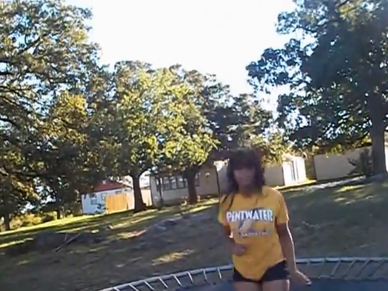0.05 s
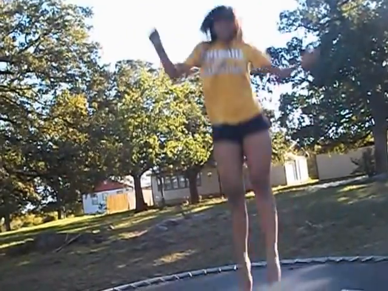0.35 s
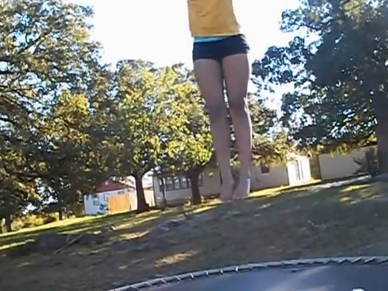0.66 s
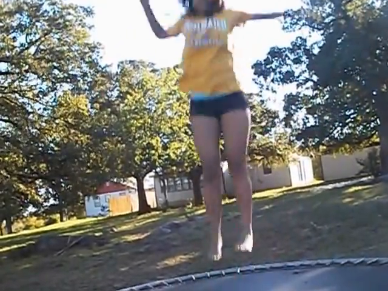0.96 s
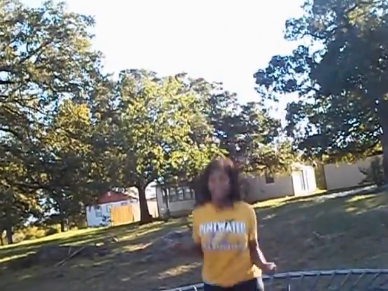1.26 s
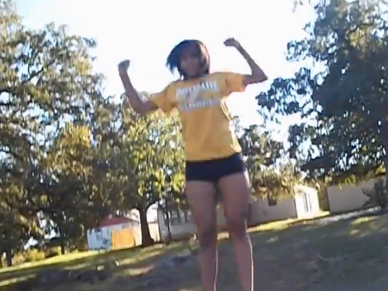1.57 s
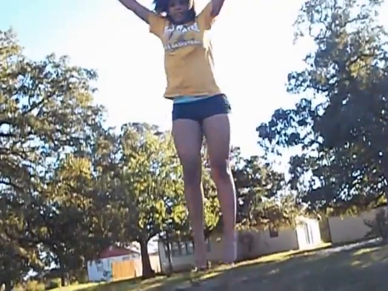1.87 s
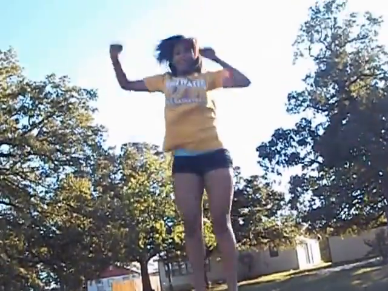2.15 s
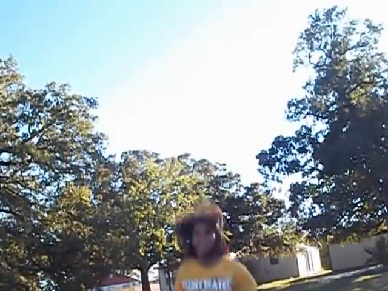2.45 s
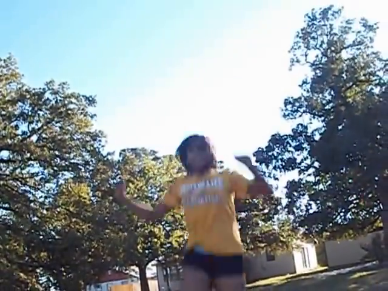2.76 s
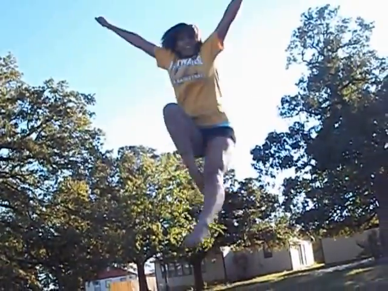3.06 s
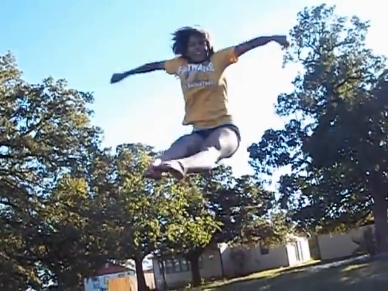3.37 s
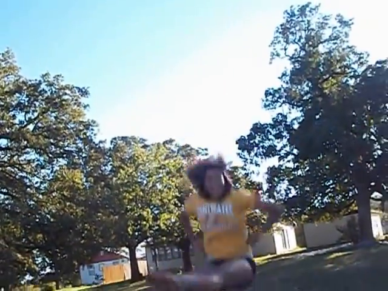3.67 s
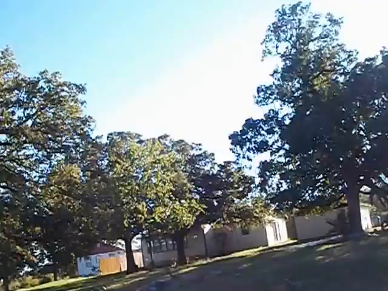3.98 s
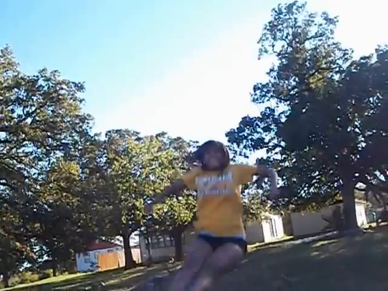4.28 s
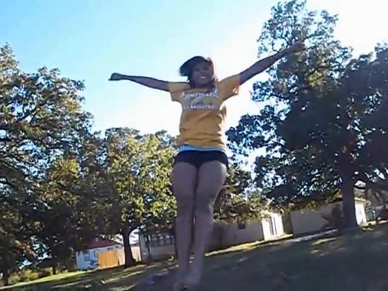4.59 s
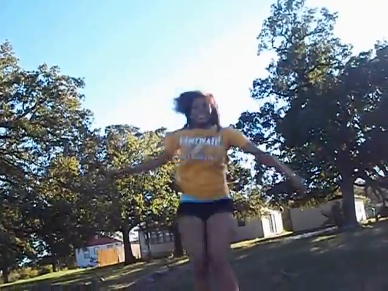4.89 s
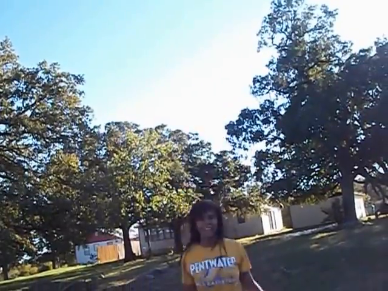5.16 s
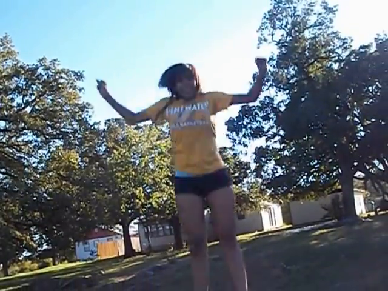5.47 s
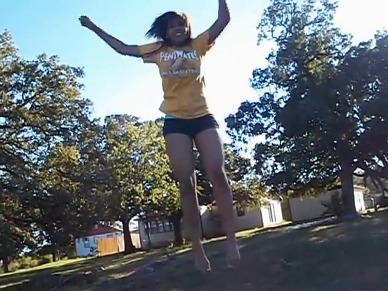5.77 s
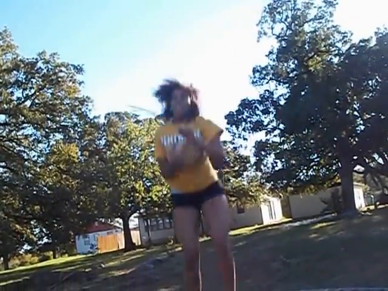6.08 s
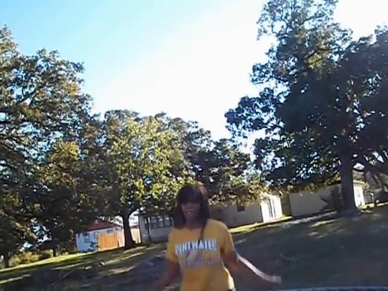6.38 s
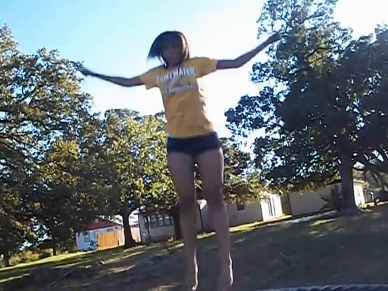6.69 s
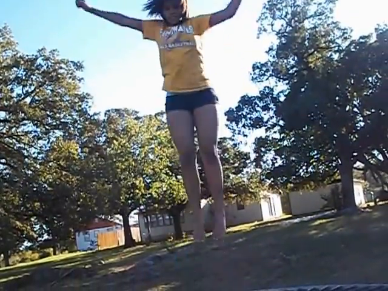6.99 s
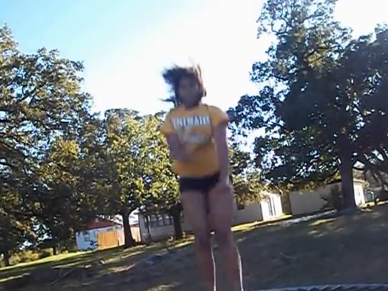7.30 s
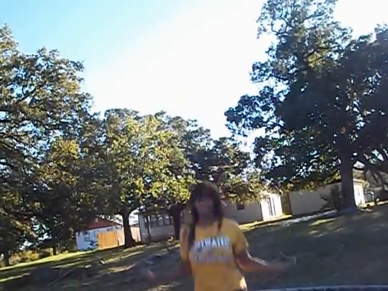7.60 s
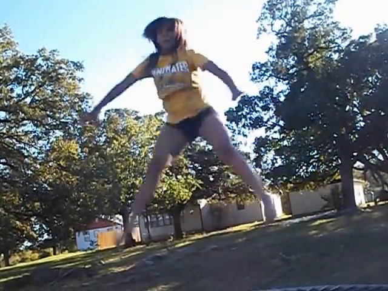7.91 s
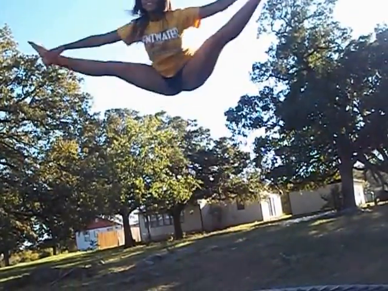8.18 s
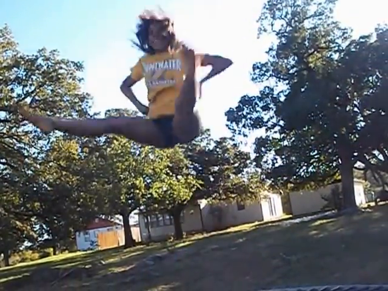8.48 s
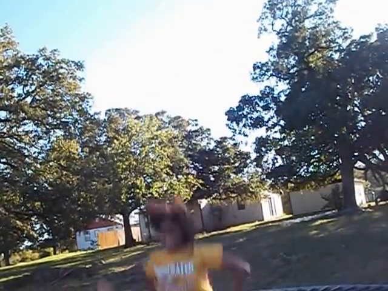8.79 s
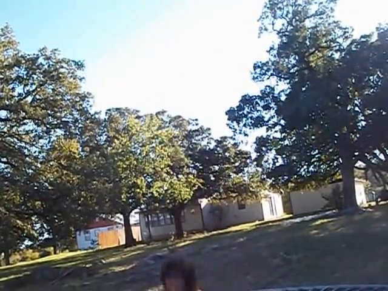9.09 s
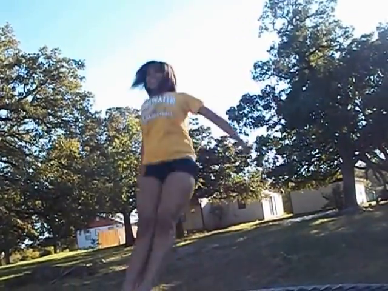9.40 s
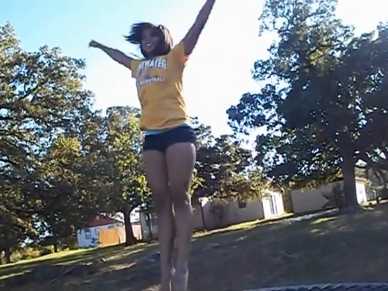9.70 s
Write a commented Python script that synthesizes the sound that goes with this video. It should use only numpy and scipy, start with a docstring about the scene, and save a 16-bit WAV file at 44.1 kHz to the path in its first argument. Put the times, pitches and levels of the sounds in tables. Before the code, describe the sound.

Rhythmic slaps of a trampoline mat, each followed by rattling, high squeaking springs, with gusting wind and a dull outdoor hush.

```python
"""Bouncing on a garden trampoline

Someone bounces close to a small camera. The mat slaps at each landing and the steel springs jingle.
Their hooks chirp as the load changes and squeak in the rocking frame between landings.
Wind buffets the microphone over a dull outdoor hush, with faint, far yaps and one soft hum."""
import sys
import numpy as np
from scipy import signal
from scipy.fft import rfft, irfft, next_fast_len
from scipy.io import wavfile
from scipy.ndimage import uniform_filter1d, map_coordinates

SR = 44100
rng = np.random.default_rng(int(sys.argv[2]) if len(sys.argv) > 2 else 0)


def master_out(mix):
    """Clip the mix to full scale and print it as 16-bit PCM to the path in sys.argv[1]."""
    frames = np.transpose(np.atleast_2d(mix))
    ceiling = np.clip(frames, -1, 1)
    pcm = np.round(ceiling * 32767).astype(np.int16)
    wavfile.write(sys.argv[1], SR, pcm)


N = 434385
T = np.arange(N) / SR

# Levels in all tables are relative; t60 is the time a sound takes to fade by 60 dB.
# The mat throws the jumper off: the springs shake and the hooks scrape, chirp, then whistle.
# t/s, shaking/dB, scrape/dB, scrape f/Hz, chirp/dB, wait for whistle/s, whistle/dB, whistle f/Hz
REBOUNDS = [(0.458, -57, -35.5, 3900, -53, 0.12, -37, 4330),
            (1.7, -51, -38, 3890, -56.5, 0.081, -36.5, 4070),
            (2.948, -52.5, -37.5, 3935, -50, 0.084, -37, 4300),
            (4.337, -56.5, -34, 3930, -51, 0.067, -39.5, 3920),
            (5.56, -61, -37, 3870, -60, 0.11, -36, 4240),
            (6.726, -63, -37, 3940, -52.5, 0.097, -36.5, 4220),
            (7.948, -54.5, -34.5, 3900, -47, 0.086, -36.5, 4270),
            (9.344, -54.5, -35.5, 3880, -50.5, 0.092, -34.5, 4270)]


def undb(db):
    """Turn decibels into a gain."""
    return 10 ** (np.asarray(db) / 20)


def unit(x):
    """Scale to an average strength (rms) of 1."""
    return x / np.sqrt(np.mean(x ** 2) + 1e-20)


def curve(rows):
    """Join (t/s, value) points with straight lines."""
    return np.interp(T, *np.transpose(rows))


def add(out, s, x):
    """Mix x into out, starting at s seconds."""
    i = max(int(s * SR), 0)
    out[i:i + len(x)] += x[:max(N - i, 0)]


def colour(x, points):
    """Shape bass and treble along an outline of (f/Hz, level/dB) points."""
    hz, db = np.transpose(points)
    size = next_fast_len(len(x))
    f = np.maximum(np.fft.rfftfreq(size, 1 / SR), 1)
    gain = undb(np.interp(np.log(f), np.log(hz), db))
    return irfft(rfft(x, size) * gain, size)[:len(x)]


def noise(points):
    """Steady noise with the given tone colour."""
    return unit(colour(rng.standard_normal(N), points))


def resonate(x, modes):
    """Let x ring at each resonance: f/Hz, width/Hz, level/dB."""
    return sum(undb(db) * signal.lfilter(*signal.iirpeak(hz, hz / width, SR), x)
               for hz, width, db in modes)


def walk(rate, size=N):
    """Wander smoothly by about 1 either way, taking `rate` random steps a second."""
    k = max(int(SR / rate), 1)
    steps = np.repeat(rng.standard_normal(size // k + 2), k)
    return 1.3 * uniform_filter1d(uniform_filter1d(steps, k), k)[:size]


def swell(half_s):
    """A position u running from -1 to 1 in twice half_s, and a bell-shaped loudness over it."""
    u = np.arange(-int(half_s * SR), int(half_s * SR)) / (half_s * SR)
    return u, np.cos(np.pi * u / 2) ** 2


def surge(s, db, rise_db_per_s, fall_db_per_s):
    """Power that builds up to a peak at time s and dies away."""
    return undb(db - rise_db_per_s * np.maximum(s - T, 0) - fall_db_per_s * np.maximum(T - s, 0)) ** 2


def fade(t, t60):
    """Die away by 60 dB every t60 seconds."""
    return np.exp(-np.log(1000) * t / t60)


def tone(hz):
    """A pure note that follows a changing pitch."""
    return np.sqrt(2) * np.sin(2 * np.pi * np.cumsum(hz) / SR)


def scatter(x, t60, wet_db):
    """Add a short, blurred tail of echoes, as when sound runs round the frame."""
    t = T[:SR // 2]
    tail = rng.standard_normal(len(t)) * fade(t, t60)
    return x + undb(wet_db) * signal.fftconvolve(x, tail / np.sqrt(np.sum(tail ** 2)))[:N]


def catch(t, rise_s=.003):
    """Rise quickly from 0 to 1 as t passes zero."""
    return .5 + .5 * np.tanh(t / rise_s)


def slaps(rise_s=0.0032, hold_s=0.0061, folds_per_s=4000):
    """The body meets the tight fabric, whose folds tick one after another in a short crack."""
    # blows on the mat: t/s, level/dB, t60/s, tilt towards treble/dB
    blows = [(1.426, -23, 0.062, 0.5), (2.654, -29, 0.022, -18), (2.677, -18.5, 0.052, 0),
             (2.995, -35.5, .06, -5), (4.082, -26.5, 0.058, -1), (4.192, -33.5, 0.013, 1),
             (5.277, -28.5, 0.063, 0), (5.433, -35.5, .03, -7), (6.453, -24, 0.071, 0),
             (7.647, -34.5, 0.23, -5), (8.991, -37.5, 0.031, -2.5), (9.086, -12, 0.043, 2)]
    # resonances of the mat: f/Hz, width/Hz, level/dB
    mat_modes = [(796, 54, 9.5), (970, 122, 13), (1390, 62, -25.5), (1537, 77, 5), (1810, 89, -10),
                 (2580, 480, -8.5), (3044, 100, -2), (3520, 74, 2.5), (4120, 260, -13.5)]
    out, t = np.zeros(N), T[:SR // 6]
    for s, db, t60, tilt in blows:
        envelope = np.minimum(0.13 + t / rise_s, 1) * fade(np.maximum(t - hold_s, 0), t60)
        folds = rng.choice([-1, 1], len(t)) * (rng.random(len(t)) < folds_per_s / SR)
        brightness = [(250, 3.5 - 2 * tilt), (750, -tilt), (4000, 5.3 * tilt), (7000, -16 + 2 * tilt)]
        crack = envelope * colour(resonate(folds, mat_modes), brightness)
        opening_rms = np.sqrt(np.mean(crack[:SR // 100] ** 2))
        add(out, s, undb(db) * crack / opening_rms)
    return out


def twang(waver_hz=16):
    """A hard landing plucks the springs, which ring on after the slap."""
    # landings that pluck the springs: t/s, level/dB
    plucks = [(1.426, -46.5), (2.677, -41.5), (4.082, -48), (5.277, -47.5), (6.453, -52), (9.0861, -34.5)]
    # notes of a plucked spring: f/Hz, level/dB, t60/s
    notes = [(3322, 0, .55), (3475, 4, 0.17), (3595, 11, 0.1), (3105, 8, .07), (2680, -6, 0.3)]
    out, t = np.zeros(N), T[:2 * SR // 3]
    for s, pluck_db in plucks:
        for hz, db, t60 in notes:
            add(out, s, undb(pluck_db + db) * fade(t, t60) * tone(hz + waver_hz * walk(330, len(t))))
    return out


def shaking(lag_s=0.047):
    """How hard the springs shake: once as the mat sinks, and again as it comes back."""
    # the mat sinks under the jumper: peak t/s, level/dB, rise/(dB/s), fall/(dB/s)
    landings = [(0.231, -49, 53, 63), (1.474, -43.5, 133, 116), (2.735, -45.5, 121, 98),
                (4.161, -45.5, 75, 101), (5.325, -43.5, 114, 57), (6.495, -45.5, 140, 87),
                (7.736, -44.5, 133, 155), (9.13, -41, 220, 116)]
    sink = sum(surge(*landing) for landing in landings)
    back = sum(surge(s + lag_s, db, rise_db_per_s=69, fall_db_per_s=34.5) for s, db, *_ in REBOUNDS)
    return np.sqrt(sink + back)


def springs(slap, ticks_per_s=2200, spread_db=3, ring_db=6, clink_db=-6, slap_db=-13):
    """Dozens of hooks tick against the frame in bunches; every tick and slap sets the coils ringing."""
    # tone colour of the rattling hooks: f/Hz, level/dB
    rattle_colour = [(400, -23), (1000, -1.5), (1600, 0.5), (2000, -5), (2600, -0.5), (3500, -0.5),
                     (4300, -3), (5000, -3.5), (6000, -9.5), (7500, -39)]
    # single hooks knocking on the frame: t/s, level/dB, time to fade to 37 percent/s
    clinks = [(0.118, -48, 0.023), (0.221, -41, 0.023), (0.349, -40, 0.02), (0.555, -44, .03),
              (0.5988, -43.5, .02), (1.9248, -40, 0.015), (2.5462, -46.5, 0.018), (3.0066, -40, .018),
              (3.173, -43.5, .02), (3.4426, -39.5, .005), (3.979, -47, 0.015), (4.039, -39.5, .02),
              (4.632, -41, .015), (5.2107, -40.5, 0.018), (5.815, -48, 0.0146), (6.495, -33.5, .03),
              (6.5988, -40.5, 0.016), (6.9757, -43.5, .014), (7.725, -40, 0.023), (7.768, -44, .012),
              (8.1643, -47, .02), (8.2716, -43, 0.02)]
    # tone colour of one knock: f/Hz, level/dB
    clink_colour = [(400, -22), (1500, -3.5), (2000, -8), (2700, 1.5), (3500, -1), (4300, -3.5),
                    (5000, -8.5), (7500, -37.5)]
    # notes of the coils: f/Hz, level/dB, t60/s
    coils = [(2320, -7, .14), (2545, -6, .12), (2622, 2.5, .11), (2682, 0, .13), (2780, -3, .09),
             (2880, -1, .07), (3022, 1.5, .11), (3115, -2, .08), (3325, 2, .3), (3360, 1, .09),
             (3460, 0, .15), (3595, 2, .15), (3665, -2, .08), (3937, -4, .1), (4200, -6, .1)]
    ticks = (rng.random(N) < ticks_per_s / SR) * rng.choice([-1, 1], N)
    ticks = ticks * undb(spread_db * rng.standard_normal(N))
    bunches = undb(2.8 * walk(130))
    unevenness = undb(1 + 2.5 * walk(35))
    rattle = unit(colour(ticks * bunches, rattle_colour)) * shaking() * unevenness
    t = T[:SR // 12]
    for s, db, decay_s in clinks:
        knock = unit(colour(rng.standard_normal(len(t)), clink_colour))
        add(rattle, s, undb(db + clink_db) * knock * np.exp(-t / decay_s))
    modes = [(hz, np.log(1000) / (np.pi * t60), db) for hz, db, t60 in coils]
    return rattle + undb(ring_db) * resonate(rattle + undb(slap_db) * slap, modes)


def squeak(hz, half_s, rough, climb_hz, grit, slip_hz=320, glide_hz=25, arch_hz=90):
    """Steel sticks and slips: an arching note, roughened by grit and side tones spaced by the slip rate."""
    u, envelope = swell(half_s)
    below_pitch_hz = climb_hz / (1 + np.exp((u * half_s + .014) / .011))  # shrinks quickly to zero
    pitch = hz + glide_hz * u - arch_hz * u ** 2 - below_pitch_hz
    # the side tones stay inside the range in which the hook rings
    sides = [1, 2] if hz < 3720 else [-1, -2] if hz > 4100 else [-1, 1]
    tones = []
    for k in [0] + sides:
        bend_hz = (k > 0) * 110 * (envelope - np.pi / 4)  # upper tones rise and fall with the pressure
        jitter_hz = (47 * np.sqrt(rough) + 20 * abs(k)) * walk(450, len(u))
        flutter = unit(undb(1.6 * (2 + abs(k)) * walk(163.3, len(u))))
        tones.append(tone(pitch + k * slip_hz + bend_hz + jitter_hz) * flutter)
    centre, near, far = tones
    far = far * undb(-6 * (abs(sides[1]) - 1))
    # the hook catches at once on a pure note; the rough part follows 7 ms later
    since_s = (u + .56) * half_s
    pure = np.sqrt(1 - rough) * centre * catch(since_s)
    harsh = np.sqrt(rough) * unit(near + far + undb(-4) * grit) * catch(since_s - .007)
    return envelope ** 0.75 * (pure + harsh)


def hooks(gain_db=-0.9, rub_db=-17.5, rub_lag_s=0.037):
    """The hooks scrape, whistle and rub on at each rebound, then squeak as the frame keeps rocking."""
    # one squeak for each swing of the frame: middle t/s, level/dB, f/Hz, half length/s, roughness/0-1
    swings = [(0.689, -54, 3960, 0.05, 0.4), (0.751, -50.5, 4020, 0.056, .6),
              (0.812, -43, 3930, 0.06, 0.23), (0.953, -48, 3980, 0.06, 0.25), (1.061, -57, 3890, 0.05, 0),
              (1.175, -54.5, 4030, 0.051, 0.2), (2.023, -47, 3950, 0.088, 0.25),
              (2.167, -53.5, 3870, 0.055, 0.74), (2.27, -59, 3900, .06, 0.14),
              (2.402, -54, 3630, 0.08, 0.3), (3.135, -50, 3910, 0.042, 0.15),
              (3.212, -48.5, 3970, 0.039, 0.2), (3.252, -44, 3615, .04, 0.15),
              (3.32, -55.5, 3860, .07, 0.4), (3.41, -49.5, 3560, .04, 0.3), (3.51, -55, 3900, 0.09, 0.5),
              (3.615, -50.5, 3850, .04, 0.18), (3.788, -57, 3870, .05, 0.3),
              (4.588, -36.5, 3980, 0.052, 0.6), (4.669, -38, 4000, .055, 0.5),
              (4.752, -42, 3910, .055, 0.37), (4.836, -41, 3910, .055, 0.4),
              (4.912, -42.5, 3940, 0.062, 0.2), (4.99, -39.5, 3880, 0.041, 0.35),
              (5.073, -46, 3890, 0.043, .45), (5.178, -46.5, 3920, 0.054, 0.1),
              (5.852, -48, 3940, 0.027, 0.1), (5.905, -46, 3900, .052, 0.4), (5.979, -55.5, 3980, .045, 0),
              (6.089, -54.5, 3920, 0.093, 0), (6.237, -51.5, 3960, 0.072, 0), (6.955, -54, 4000, 0.033, .3),
              (7.03, -46.5, 3810, 0.059, 0.5), (7.099, -51.5, 3740, 0.044, 0.4),
              (7.237, -49, 3624, .075, 0.16), (7.422, -49, 3590, 0.036, .3), (8.23, -47, 3900, 0.022, 0.1),
              (8.26, -47, 3580, 0.024, 0.15), (8.3, -48.5, 3820, 0.05, 0), (8.365, -56, 3780, 0.037, .15),
              (8.422, -45.5, 3920, .045, 0.24), (8.503, -47, 3600, 0.048, 0.4),
              (8.604, -53.5, 3950, 0.046, 0.16), (8.651, -49.5, 3570, 0.034, 0.1),
              (8.802, -52.5, 3620, 0.047, 0.43), (8.871, -54, 3920, .07, 0.27),
              (8.998, -48, 3860, 0.042, 0.16), (9.498, -38.5, 3890, 0.03, .15),
              (9.581, -34.5, 3900, .04, 0.4), (9.653, -37, 3960, .045, 0.67), (9.709, -41, 3970, .04, 0.3),
              (9.812, -39, 3647, 0.045, 0.47)]
    # resonances of a rubbed hook: f/Hz, width/Hz, level/dB
    hook_modes = [(3354, 110, -5), (3480, 140, -2), (3900, 200, 8), (3930, 220, -2)]
    rasp_colour = [(2000, -13), (3000, -5), (3400, 0.5), (4300, -2.5), (4600, -13.5), (7000, -24)]
    slips = rng.standard_normal(N) * undb(2.7 * walk(500))
    rasp = unit(colour(resonate(slips, hook_modes), rasp_colour))
    scrape, whistle = (0.07, 0.66, 0), (0.058, 0.2, 340)  # half length/s, roughness/0-1, climb/Hz
    events = [(*swing, 0) for swing in swings]
    for s, _, scrape_db, scrape_hz, _, gap_s, whistle_db, whistle_hz in REBOUNDS:
        events += [(s, scrape_db, scrape_hz, *scrape), (s + gap_s, whistle_db, whistle_hz, *whistle)]
    out = np.zeros(N)
    for s, db, hz, half_s, rough, climb_hz in events:
        span = int((s - half_s) * SR) + np.arange(2 * int(half_s * SR))
        grit = np.take(rasp, span, mode="wrap")
        sound = squeak(hz, half_s, np.clip(rough, .04, .9), climb_hz, grit)
        add(out, s - half_s, undb(db + gain_db) * sound)
    rubbing = sum(surge(s + rub_lag_s, db + rub_db, rise_db_per_s=260, fall_db_per_s=15)
                  for s, _, db, *_ in REBOUNDS)
    out += rasp * np.sqrt(rubbing)
    return scatter(out, t60=0.09, wet_db=-7)  # the tube of the frame smears each squeak a little


def chirps(half_s=0.039, rebound_lag_s=0.013, rebound_hz=4870, rebound_upper_db=-9):
    """A tight hook lets go with a scratchy falling chirp and a weaker high note."""
    # hook chirps, higher ones at each landing and lower ones among the squeaks afterwards:
    # middle t/s, level/dB, f/Hz, high note against the low/dB
    hook_chirps = [(0.125, -49, 5300, -10), (1.36, -49, 5480, -9), (1.91, -51, 4730, -21),
                   (2.621, -43, 5300, -10), (3.17, -45, 4410, -41), (4.05, -47, 5670, -9),
                   (4.28, -50, 5020, -17), (4.44, -53.5, 4900, -16), (5.25, -42, 5600, -13),
                   (5.62, -57, 4960, -17), (6.389, -38.5, 5490, -11), (7.66, -50.5, 5700, -13),
                   (8.171, -47, 4720, -21), (9.04, -48.5, 5300, -12), (9.505, -50, 4760, -21),
                   (9.58, -42.5, 4950, -15), (9.65, -48, 4870, -19.5), (9.735, -51, 4740, -18),
                   (9.808, -42, 4900, -19)]
    on_rebounds = [(s + rebound_lag_s, db, rebound_hz, rebound_upper_db)
                   for s, _, _, _, db, *_ in REBOUNDS]
    out = np.zeros(N)
    u, envelope = swell(half_s)
    for s, db, hz, upper_db in hook_chirps + on_rebounds:
        # the higher hook, which chirps before a landing, slides further
        fall_hz, jitter_hz, upper_hz = (495, 210, 6500) if hz > 5100 else (115.5, 49, 7150)
        lower = tone(hz - fall_hz * u + jitter_hz * walk(700, len(u)))
        upper = tone(upper_hz + .5 * fall_hz * u + jitter_hz * walk(900, len(u)))
        flutter = unit(undb(4 * walk(250, len(u))))
        add(out, s - half_s, undb(db) * envelope ** 1.4 * flutter * (lower + undb(upper_db) * upper))
    return scatter(out, t60=0.2, wet_db=-13)


def wind(buffet_db=3, eddy_db=2, puff_db=-5):
    """Air flows over the microphone: a buffeting rumble, finer swirls (eddies) and sudden puffs."""
    # strength of the rumble and of the eddies: t/s, level/dB
    rumble_levels = [(0.0, -42), (0.55, -34.5), (0.63, -41.5), (0.78, -31.5), (0.83, -37), (0.96, -47),
                     (1.04, -33.5), (1.95, -43.5), (2.13, -32), (2.27, -30), (2.63, -32.5), (3.81, -44),
                     (4.09, -27), (4.61, -53.5), (4.66, -33.5), (4.77, -43.5), (6.67, -40), (6.72, -22.5),
                     (6.78, -39.5), (6.99, -29), (7.05, -41), (7.21, -33), (7.32, -46), (7.38, -30),
                     (7.43, -39.5), (8.12, -45), (8.2, -32.5), (8.29, -51), (8.75, -45.5), (8.8, -30.5),
                     (9.08, -35.5), (9.3, -49), (9.46, -31), (9.49, -39.5), (9.79, -48), (9.85, -33)]
    eddy_levels = [(0.0, -46), (1.1, -53), (2.14, -45), (2.85, -36.5), (3.35, -49), (3.59, -50.5),
                   (4.03, -50.5), (4.5, -54), (7.93, -55), (8.42, -63), (9.0, -48.5), (9.85, -59)]
    # tone colour of the rumble and of the eddies: f/Hz, level/dB
    rumble_colour = [(8, -9.5), (25, 0.5), (50, -1.5), (100, -4.5), (160, -11.5), (260, -30.5),
                     (600, -44.5), (2000, -77)]
    eddy_colour = [(60, -7), (160, -1.5), (300, -2), (500, -3.5), (900, -18.5), (1400, -21), (3000, -38.5),
                   (7000, -56.5)]
    # puffs of air: middle t/s, level/dB, half length/s, centre f/Hz
    puffs = [(0.345, -24.5, 0.025, 65), (0.546, -28.5, .016, 130), (0.588, -32.5, .014, 140),
             (0.781, -20.5, 0.03, 165), (1.093, -30.5, .022, 150), (1.171, -24, 0.022, 145),
             (1.318, -29.5, 0.04, 150), (2.13, -27, .035, 75), (2.22, -26, 0.035, 150),
             (2.559, -27, 0.037, 234), (2.978, -23, 0.024, 110), (3.374, -35, 0.014, 216),
             (3.983, -27, 0.039, 150), (4.066, -27, 0.051, 220), (4.102, -17, .022, 237),
             (5.044, -36, .04, 55), (5.378, -33, .035, 70), (6.726, -19.5, 0.026, 160),
             (6.973, -30, .014, 130), (7.004, -29.5, 0.014, 140), (7.136, -30.5, 0.02, 192),
             (7.21, -28, .025, 170), (7.375, -22, 0.02, 131), (7.562, -31, 0.014, 196),
             (8.822, -32, 0.029, 146), (8.889, -34.5, 0.018, 130), (8.995, -27.5, 0.014, 192),
             (9.097, -27, 0.023, 228), (9.638, -27, 0.0161, 140), (9.82, -29, .028, 85)]
    # tone colour of a puff: multiple of its centre frequency, level/dB
    puff_colour = [(.15, -8.5), (.45, 3), (1, 1), (1.8, -8), (3, -21.5), (5, -24), (11, -45.5), (35, -65.5)]
    out = noise(rumble_colour) * undb(curve(rumble_levels) + buffet_db * walk(18))
    out += noise(eddy_colour) * undb(curve(eddy_levels) + eddy_db + 3.36 * walk(45))
    for s, db, half_s, centre_hz in puffs:
        u, envelope = swell(half_s)
        outline = [(ratio * centre_hz, level) for ratio, level in puff_colour]
        air = colour(rng.standard_normal(len(u)), outline)
        add(out, s - half_s, undb(db + puff_db) * unit(air * envelope ** 2))
    return out


def yaps(half_s=0.043, arch_hz=260, hoarse_hz=90, gain_db=-2, third_db=-16):
    """Hoarse calls that rise and fall; only their second and third harmonics carry over the gardens."""
    # far yaps: middle t/s, level/dB, second harmonic f/Hz, fall per half length/Hz
    calls = [(0.304, -30, 931, 219), (4.718, -31.5, 1000, 40), (4.912, -33, 940, 70.4),
             (5.112, -38.5, 920, 70), (7.66, -33.5, 924, 70), (7.857, -35.5, 980, 69.6),
             (8.058, -34, 920, 69.6), (8.272, -34.5, 952, 70.7), (8.476, -35, 993, 200),
             (8.686, -38, 945, 70.4), (9.348, -37.5, 945, 69), (9.551, -42.5, 950, 70.4)]
    out = np.zeros(N)
    u, envelope = swell(half_s)
    for s, db, hz, fall_hz in calls:
        second_hz = hz - fall_hz * u - arch_hz * u ** 2 + hoarse_hz * walk(500, len(u))
        voice = tone(second_hz) + undb(third_db) * tone(1.5 * second_hz)
        add(out, s - half_s, undb(db + gain_db) * envelope ** 2 * voice)
    return colour(scatter(out, t60=0.33, wet_db=-6), [(1080, -0.5), (1300, -3), (2000, -24)])


def hum(middle_s=1.8, half_s=.9, hz=658, waver_hz=14, db=-46):
    """A faint, wavering hum swells once in the distance."""
    out = np.zeros(N)
    u, envelope = swell(half_s)
    add(out, middle_s - half_s, undb(db) * envelope * tone(hz + waver_hz * walk(60, len(u))))
    return out


def hush(gain_db=3):
    """Distant outdoor noise slowly rises and falls."""
    # strength of the hush: t/s, level/dB
    levels = [(0.0, -41), (2.91, -40.5), (3.54, -43.5), (4.17, -39), (4.28, -43), (6.28, -41.5),
              (6.56, -39), (7.57, -40.5), (8.23, -42.5), (9.85, -45.5)]
    # its dull tone colour: f/Hz, level/dB
    hush_colour = [(60, 5), (250, -13.5), (400, -8), (520, -2.5), (660, 1.5), (820, 2), (1020, -1),
                   (1150, -10.5), (1320, -17.5), (2000, -26), (3000, -26.5), (4200, -30), (5500, -29.5),
                   (7500, -60.5)]
    return noise(hush_colour) * undb(curve(levels) + gain_db + 0.51 * walk(10))


def scene(left_lag_s=8.4e-5):
    """Everything reaches one microphone; the left channel runs a hair behind the right."""
    slap = slaps()
    trampoline = scatter(slap, t60=0.24, wet_db=-12) + twang() + springs(slap) + hooks() + chirps()
    right = trampoline + wind() + yaps() + hum() + hush()
    left = map_coordinates(right, [np.arange(N) - left_lag_s * SR], order=3, mode="nearest")
    return np.array([left, right])


def record(dry, ceiling=.85, treble_hz=6500, top_hz=7500):
    """The loudest slap is gently rounded, the treble softened and the very top cut off."""
    rounded = ceiling * np.tanh(dry / ceiling)
    soft = signal.sosfilt(signal.butter(6, treble_hz, fs=SR, output="sos"), rounded)
    return signal.sosfilt(signal.ellip(8, .2, 70, top_hz, fs=SR, output="sos"), soft)


dry = scene()
out = record(dry)
master_out(out)
```